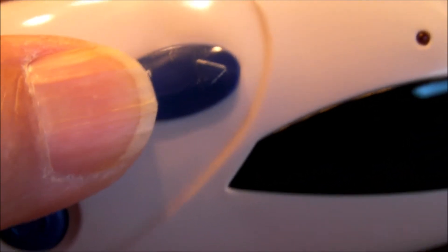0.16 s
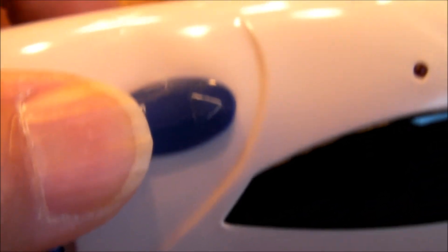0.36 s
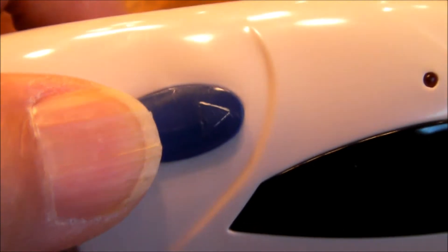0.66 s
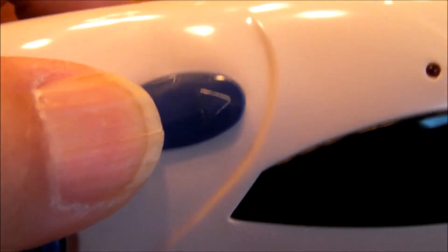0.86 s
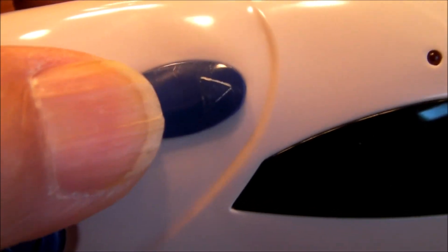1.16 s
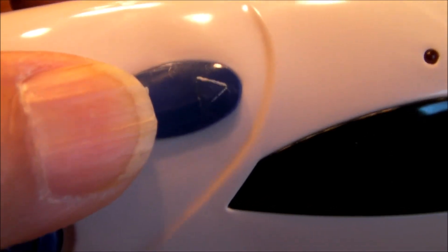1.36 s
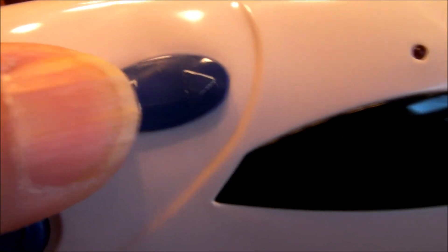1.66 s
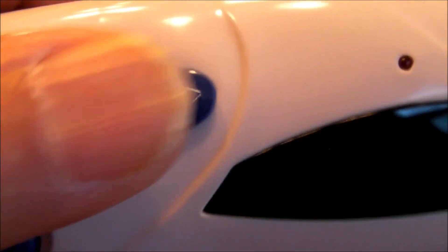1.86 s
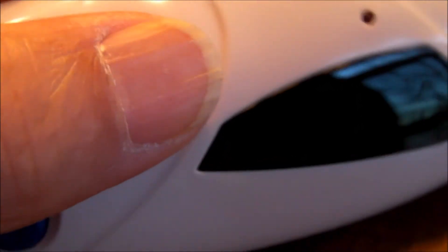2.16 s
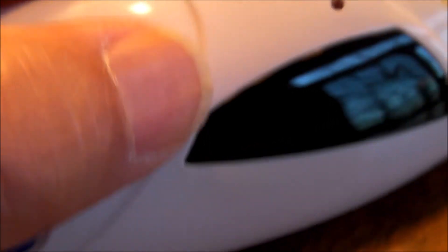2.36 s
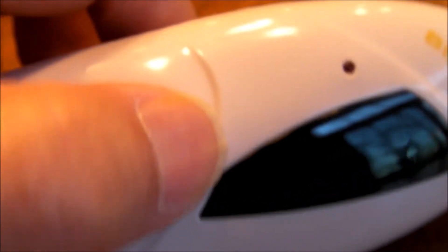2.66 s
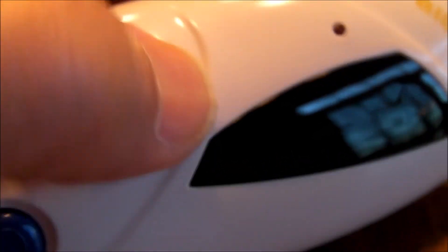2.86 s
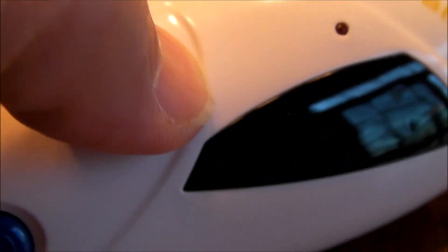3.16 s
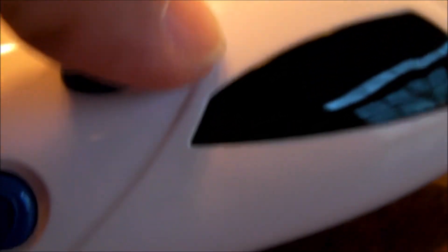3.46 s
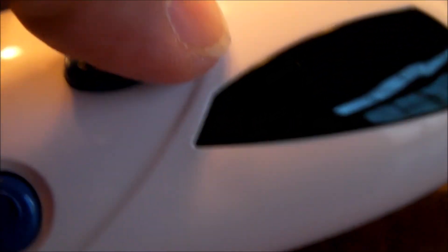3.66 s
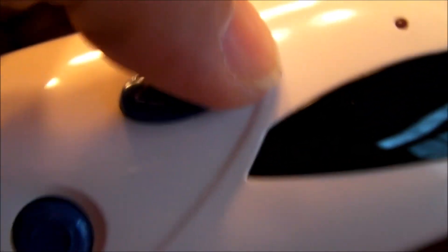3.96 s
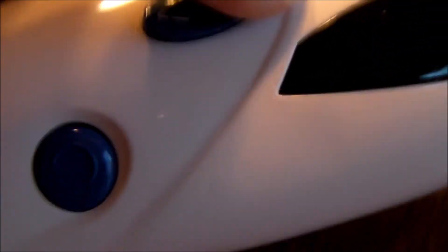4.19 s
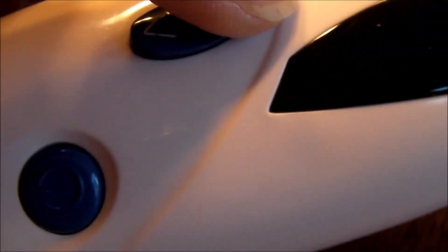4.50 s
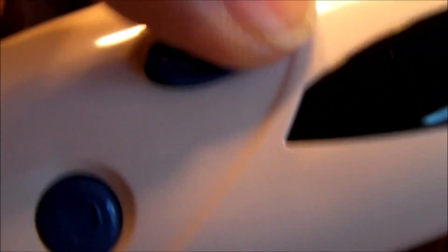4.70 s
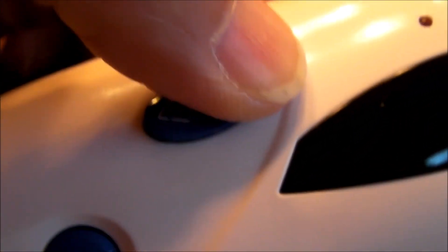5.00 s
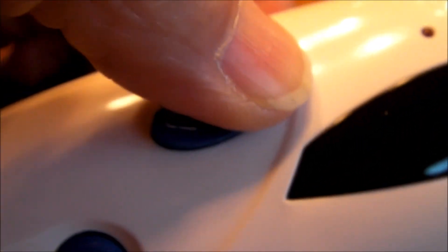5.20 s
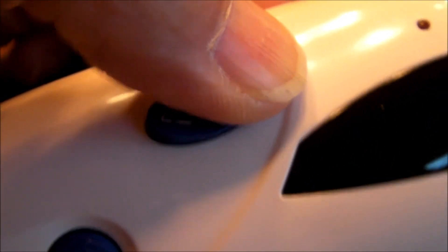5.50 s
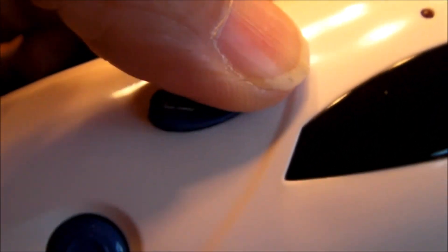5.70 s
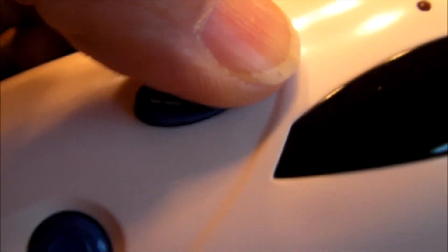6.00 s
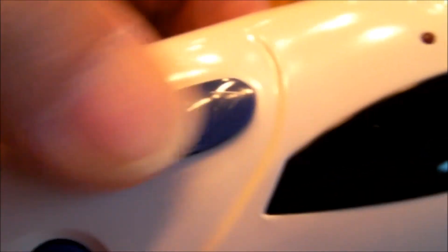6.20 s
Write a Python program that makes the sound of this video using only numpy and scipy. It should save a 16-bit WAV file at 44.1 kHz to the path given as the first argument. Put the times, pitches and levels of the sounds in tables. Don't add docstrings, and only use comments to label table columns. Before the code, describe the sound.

Firm, bright button clicks on a hollow handheld shell, first one alone, then a steady group. The shell bumps something with a low thump that rings briefly. After soft finger drags and a couple of muffled clicks there is a pause, then rapid paired clicks, strong and weak by turns, thicker in tone. Close stereo microphone, small indoor room with little echo, quiet hiss and low room noise.

```python
import sys
import numpy as np
from scipy import signal
from scipy.fft import rfft, irfft, next_fast_len
from scipy.io import wavfile
from scipy.ndimage import uniform_filter1d

SR = 44100
rng = np.random.default_rng(int(sys.argv[2]) if len(sys.argv) > 2 else 0)


def linear_from_db(decibels):
    return 10 ** (np.asarray(decibels, float) / 20)


def dump(signal):
    limited = np.clip(np.atleast_2d(signal).T, -1, 1)
    pcm = np.round(limited * 32767).astype(np.int16)
    wavfile.write(sys.argv[1], SR, pcm)


N = 279770

# start in seconds, peak of the 0.7-2 kHz shell ring in dB,
# edge (2-6 kHz) in dB re ring, fizz (above 6 kHz) in dB re ring.
NEAR_SNAPS = [
    (0.007, -24, -1.5, -4),
    (0.755, -24.5, -4.5, -3),
    (0.99, -23.5, -1, -4.5),
    (1.216, -25.5, -3.5, -3.5),
    (1.37, -24.5, -2, -4),
    (1.518, -25, -5, -2.5),
    (1.696, -23.5, 3, 3.5),
    (1.979, -49.5, 5.5, -35),
]
MUTED_SNAPS = [
    (3.113, -30, 4.2, 1.5),
    (3.366, -40, 4.6, 2.6),
]
FAR_SNAPS = [
    (4.648, -25, -10, -19.5),
    (4.897, -34.5, 2.5, 2),
    (5.132, -26, -9, -14),
    (5.327, -38, -3.5, 0),
    (5.493, -25.5, -4.5, -12),
    (5.603, -36, -3, -2),
    (5.723, -25, -6, -5.5),
    (5.881, -44.5, 0.5, -1),
    (5.986, -24.5, -6, -5.5),
    (6.127, -31, 2.5, -0.5),
]
KNOCKS = [
    (2.324, -29.5, 3.5, -6.5),
    (2.334, -34.5, -1.5, -9),
    (2.347, -41.5, -10, -12),
]
# start in seconds, ring in dB,
# brightness of edge and fizz in dB re ring.
NEAR_TOUCHES = [
    (0.399, -55.5, -11),
    (1.748, -53.5, 5),
    (1.914, -91.5, 32.5),
    (3.182, -52.5, -14),
    (3.211, -55, -7),
    (3.246, -55.5, -13),
    (3.283, -57.5, -0.5),
    (3.465, -64, 8.5),
    (3.67, -61.5, 12.5),
]
FAR_TOUCHES = [
    (0.179, -57, -13),
    (0.424, -55, -14),
    (0.518, -63, -17.5),
    (4.027, -56, -0.5),
    (4.581, -56, -6.5),
    (5.907, -64, -15),
    (6.307, -53, -6),
]

# frequency in Hz, level in dB, t60 in seconds.
NEAR_SHELL = [(400, -4, .03), (760, -8, .05), (958, -4, .03), (1110, 2, .03), (1260, -5, .02),
              (1550, -12, .012), (2560, -1, .011), (5100, -2, .01), (8400, 0, .006), (14000, 0, .003),
              (583, -2, .135)]
MUTED_SHELL = [(389, -9, 0.058), (645, -5.5, 0.036), (950, 0.5, 0.014), (1096, 1, 0.031), (1200, -15, 0.035),
               (2640, 2, 0.014), (4960, 4, 0.017), (5320, -1, 0.016), (8500, 0, 0.0034), (14000, 10, .003)]
FAR_SHELL = [(373.3, 11.5, 0.12), (411.3, 12.5, 0.12), (583.5, 15.5, 0.084), (740, 14, 0.0038),
             (886, 6, 0.0095), (1092, -1, 0.031), (1820, -5, 0.011), (2284, 2.5, 0.021), (2876, 5.5, 0.012),
             (8920, -1.5, 0.0032), (12170, 0, 0.0043), (14400, 4, .003)]
KNOCK_SHELL = [(119.7, -7.5, 0.26), (183.3, -3, 0.38), (267, -0.5, 0.11), (333, -11, 0.12),
               (417.5, 8.5, 0.11), (474, -6, 0.33), (567, 13, 0.052), (863, 11.5, 0.16), (986, 13.5, 0.084),
               (1280, -9, 0.26), (2320, -8, 0.058), (3930, -10, 0.027), (5600, 7, 0.014),
               (10570, -15, 0.028)]
# low edge in Hz, high edge in Hz, level in dB re clear modes, t60 in seconds.
SNAP_CROWD = [(298, 636, -3.5, 0.0155), (744, 1520, -6, 0.017), (1650, 6200, 3.5, 0.02),
              (6250, 13400, 19.5, 0.0056)]
PAD_CROWD = [(241, 865, -2.5, 0.063), (643, 2020, -12.5, 0.017), (2120, 6630, 2, 0.017),
             (6600, 13000, -7, 0.0029)]
KNOCK_CROWD = [(109, 620, -6.5, 0.2), (910, 1960, -0.5, 0.071), (2220, 6300, 11, 0.025),
               (6500, 20500, 4, 0.02)]

# frequency in Hz, level in dB, t60 in seconds.
BOOM = [(122.7, -41.5, 0.56), (169, -47, .55), (185.6, -44.5, 0.69), (247, -55, 0.27)]
# frequency in Hz, t60 in seconds.
ROOM = [(150, 0.88), (600, 0.56), (1500, 0.29), (4000, 0.22), (12000, 0.21)]
# frequency in Hz, phase in radians.
PORTS = [(100, -.05), (1500, -.12), (3200, -.3), (5000, -1.), (8000, -1.6), (12000, -1.9), (16000, -2.1)]
# frequency in Hz, level in dB re the hit's energy.
SMEAR = [(150, -37), (500, -11), (1100, -15.5), (2500, -13), (6000, -10.5), (12000, -12), (16000, -11)]

# start in seconds, length in seconds,
# top level in dB, squeak in Hz, squeak in dB re level.
DRAGS = [
    (1.734, 0.27, -65, 3300, -4),
    (2.108, 0.37, -60, 3700, -4),
    (2.707, 0.39, -64.5, 3830, -3),
    (3.039, 0.12, -56.5, 3860, -5),
    (3.145, .12, -61.5, 4240, 0),
    (3.254, 0.21, -62, 5170, -0.5),
    (3.67, 0.38, -60.5, 3200, -5),
    (3.84, 0.04, -60, 2850, 16),
    (3.892, 0.61, -58.5, 2550, -0.5),
    (6.155, 0.03, -48, 4160, 10),
]
SLIPS = [
    (1.961, 0.22, -53.5, 5600, -2.5),
    (2.34, .3, -58, 3320, -6.5),
    (3.41, 0.44, -62.5, 4300, -3),
    (6.17, 0.31, -60, 4160, 7),
]
# frequency in Hz, level in dB per Hz.
RUB = [(150, -11.5), (500, 0), (1200, 1.5), (2600, -2.5), (4500, -2.5), (8000, -4.5), (12000, -5),
       (16000, -6)]
HUSH = [(25, -19), (85, -12), (130, -7), (250, -16), (700, -20), (1200, -24), (4000, -30), (16500, -33.5)]
# frequency in Hz, likeness from -1 to 1.
RUB_SAME = [(60, 0.33), (180, 1), (550, 1), (1650, 0.84), (4970, 0.38), (15000, -0.25)]
HUSH_SAME = [(60, 0.49), (180, 0.94), (550, 0.37), (1650, -0.096), (4970, 0.0094), (15000, -0.17)]
# frequency in Hz, width in octaves, height in dB.
HUMS = [(187.4, 0.091, 6), (426, 0.26, 7), (3060, 0.15, 6)]

FIRM_DB = -24
NEAR_HOLLOW_DB, MUTED_HOLLOW_DB, FAR_HOLLOW_DB, KNOCK_HOLLOW_DB, TOUCH_HOLLOW_DB = -12.5, -12.5, -10, 3.3, -15.5
NEAR_SOFT, MUTED_SOFT, FAR_SOFT, KNOCK_SOFT = 0.46, 0.6, 0.64, 0.61
HOLLOW_PER_BRIGHT_DB = -1.2
NEAR_SMEAR_DB, MUTED_SMEAR_DB, FAR_SMEAR_DB, KNOCK_SMEAR_DB, TOUCH_SMEAR_DB = 4.5, 4.5, 5.5, -0.5, 4.5
BLOCK_S, BLOCK_START_S = 1024 / 48000, 0.0011
BLOCK_ROUND, BLOCK_PICK = 2, 1.47
DRAG_TOP, SLIP_TOP, ROUND = 0.47, 0.11, 0.96
BOOM_RISE_S = 0.03
HUSH_DB = -60


def evened(x):
    return x / np.sqrt(np.mean(x ** 2) + 1e-20)


def read(points, hz):
    f, value = np.transpose(points)
    return np.interp(np.log(hz + 1), np.log(f + 1), value)


def add(mix, s, sound):
    part = mix[:, round(s * SR):][:, :sound.shape[1]]
    part += sound[:, :part.shape[1]]


def level_out(x, shape):
    for _ in range(3):
        z = rfft(x * shape)
        x = irfft(z / (abs(z) + 1e-9), len(shape))
    return x * shape


def presses(snaps, touches, hollow_db, soft, smear_db):
    rows = [(s, db, hollow_db + soft * (FIRM_DB - db), edge, fizz, smear_db) for s, db, edge, fizz in snaps]
    for s, db, bright in touches:
        hollow = TOUCH_HOLLOW_DB + HOLLOW_PER_BRIGHT_DB * bright
        rows.append((s, db, hollow, bright, bright, TOUCH_SMEAR_DB))
    return sorted(rows)


def snap(row, shell, crowd, rattle_s, size):
    s, ring_db, hollow_db, edge_db, fizz_db = row[:5]
    t = np.arange(size) / SR
    u = t[:500] / rattle_s
    taps = rng.standard_normal((2, 500)) * (rng.random(500) < 0.2)
    shared, differing = level_out(taps, np.minimum(u * 8, 1) * np.exp(-u ** 2))

    hz, db, t60 = np.transpose(shell)[:, :, None]
    shifted = hz * (1 + 0.0078 * rng.standard_normal(hz.shape))
    modes = linear_from_db(db - 60 * t / t60) * np.sin(2 * np.pi * shifted * t)
    group = np.digitize(hz[:, 0], [700, 1950, 6000])
    levels = [ring_db + hollow_db, ring_db, ring_db + edge_db, ring_db + fizz_db]
    port_gaps = [0.07, 0.12, 0.2, 0.3]
    hiss, out = rng.standard_normal(size), np.zeros((2, size))
    for k, level_db in enumerate(levels):
        low_hz, high_hz, crowd_db, crowd_t60 = crowd[k]
        band = signal.butter(2, [low_hz, high_hz], "bandpass", fs=SR, output="sos")
        clear = modes[group == k].sum(0)
        dense = signal.sosfilt(band, level_out(hiss, linear_from_db(-30 * t / crowd_t60)))
        body = signal.sosfilt(band, evened(clear) + linear_from_db(crowd_db) * evened(dense))
        drive = shared + port_gaps[k] * np.outer([1, -1], differing)
        part = signal.fftconvolve(drive, body[None], axes=1)[:, :size]
        peak = np.sqrt(uniform_filter1d(part.mean(0) ** 2, size=128).max())
        out += linear_from_db(level_db) * part / peak
    return s, out


def smear(s, hit):
    t = np.arange(-1900, 1900) / SR
    into = (s + 0.002 - BLOCK_START_S) % BLOCK_S + np.array([[0], [BLOCK_S]])

    def block(u):
        return abs(np.sin(np.pi * np.clip(u / (2 * BLOCK_S), 0, 1)))

    both = block(into) ** BLOCK_PICK * block(into + t) ** BLOCK_ROUND
    shape = np.sqrt((both ** 2).sum(0))
    grain = rng.standard_normal((2, len(t)))
    side = signal.lfilter([0.5, -0.5], 1, grain[1])
    grain = (grain[0] + 1.76 * np.outer([1, -1], side)) * shape
    broad = np.sqrt(uniform_filter1d(abs(rfft(hit[:, :1500], len(t))) ** 2, size=16))
    colour = broad * linear_from_db(read(SMEAR, np.fft.rfftfreq(len(t), 1 / SR)))
    spread = irfft(rfft(grain / np.linalg.norm(grain[0])) * colour)
    skip = max(round((-t[0] - s) * SR), 0)
    return s + t[0] + skip / SR, spread[:, skip:]


def ports(x):
    size = next_fast_len(N)
    turn = np.exp(0.5j * np.outer([1, -1], read(PORTS, np.fft.rfftfreq(size, 1 / SR))))
    return irfft(rfft(x, size) * turn, size)[:, :N]


def room(x):
    taps = np.zeros((2, SR // 2))
    at = np.arange(200, SR // 2 - 20, 20)
    at = at + rng.integers(0, 20, (2, len(at)))
    np.put_along_axis(taps, at, rng.choice([-1., 1.], at.shape), 1)
    taps = taps + 2.2 * taps.mean(0)
    hz, t, z = signal.stft(taps, SR, nperseg=256)
    decay = linear_from_db(-60 * t / read(ROOM, hz)[:, None])
    tail = signal.istft(z * decay, SR, nperseg=256)[1]
    return signal.fftconvolve(x.mean(0)[None], tail / np.linalg.norm(tail[0]), axes=1)[:, :N]


def boom():
    t = np.maximum(np.arange(N) / SR - KNOCKS[0][0], 0)
    ringing = sum(linear_from_db(db - 60 * t / t60) * np.sin(2 * np.pi * hz * t) for hz, db, t60 in BOOM)
    return (1 - np.exp(-t / BOOM_RISE_S)) * ringing


def strokes(t):
    arches = []
    for rows, top in [(DRAGS, DRAG_TOP), (SLIPS, SLIP_TOP)]:
        for s, length, top_db in np.array(rows)[:, :3]:
            u = np.clip((t - s) / length, 0, 1) ** (np.log(0.5) / np.log(top))
            arches.append(linear_from_db(top_db) * abs(np.sin(np.pi * u)) ** ROUND)
    return np.array(arches)


def skin_db(t, hz):
    share = strokes(t[:, 0]).T ** 2
    share = share / (share.sum(1)[:, None] + 1e-12)
    squeak_hz, squeak_db = np.array(DRAGS + SLIPS).T[3:, :, None]
    bands = (squeak_db + 5.5) * np.exp(-(np.log2((hz + 1) / squeak_hz) / 0.36) ** 2)
    return read(RUB, hz) + share @ bands


def noise(size, colour_db, same, patchy_db):
    hz = np.fft.rfftfreq(size, 1 / SR)
    s = np.arange(4 * N // size + 5)[:, None] * size / 4 / SR
    a, b, c, d, patches = np.moveaxis(rng.standard_normal((len(s), len(hz), 5)), 2, 0)
    patches = evened(uniform_filter1d(uniform_filter1d(patches, size=8, axis=0), size=10, axis=1))
    same = np.clip(read(same, hz), -1, 1)
    left = a + 1j * b
    right = same * left + np.sqrt(1 - same ** 2) * (c + 1j * d)
    z = np.array([left, right]) * linear_from_db(colour_db(s, hz) + patchy_db * patches)
    return evened(signal.istft(z.transpose(0, 2, 1), nperseg=size, noverlap=3 * size // 4)[1][:, :N])


def rustle():
    level = linear_from_db(2.5) * np.sqrt((strokes(np.arange(N) / SR) ** 2).sum(0))
    return level * noise(size=512, colour_db=skin_db, same=RUB_SAME, patchy_db=2.5)


def hush_db(s, hz):
    return read(HUSH, hz) + sum(db * np.exp(-(np.log2((hz + 1) / f) / w) ** 2) for f, w, db in HUMS)


def hush():
    return linear_from_db(HUSH_DB) * noise(size=2048, colour_db=hush_db, same=HUSH_SAME, patchy_db=1.4)


def scene():
    near = presses(NEAR_SNAPS, NEAR_TOUCHES, NEAR_HOLLOW_DB, NEAR_SOFT, NEAR_SMEAR_DB)
    muted = presses(MUTED_SNAPS, [], MUTED_HOLLOW_DB, MUTED_SOFT, MUTED_SMEAR_DB)
    far = presses(FAR_SNAPS, FAR_TOUCHES, FAR_HOLLOW_DB, FAR_SOFT, FAR_SMEAR_DB)
    knock = presses(KNOCKS, [], KNOCK_HOLLOW_DB, KNOCK_SOFT, KNOCK_SMEAR_DB)
    hits, smears = np.zeros((2, 2, N))
    for rows, shell, crowd, rattle_s, size in [(near, NEAR_SHELL, SNAP_CROWD, 0.003, SR // 7),
                                               (muted, MUTED_SHELL, SNAP_CROWD, 0.0025, SR // 7),
                                               (far, FAR_SHELL, PAD_CROWD, 0.0026, SR // 7),
                                               (knock, KNOCK_SHELL, KNOCK_CROWD, 0.003, SR // 3)]:
        for row in rows:
            s, hit = snap(row, shell, crowd, rattle_s, size)
            add(hits, s, hit)
            add(smears, *smear(s, linear_from_db(row[-1]) * hit))
    direct = linear_from_db([[-0.5], [0.5]]) * ports(hits + smears)
    return direct + linear_from_db(-17.5) * room(hits) + boom() + rustle() + hush()


def top_cut(x):
    return signal.sosfilt(signal.butter(12, 16810, fs=SR, output="sos"), x)


def record(dry):
    bass_cut = signal.butter(2, 60, "highpass", fs=SR, output="sos")
    band_limit = signal.firwin(255, 15800, window=("kaiser", 7), fs=SR)
    heard = signal.oaconvolve(signal.sosfilt(bass_cut, dry), band_limit[None], "same")
    mix = signal.lfilter(*signal.iirnotch(7900, 40, SR), heard)
    return top_cut(mix)


dry = scene()
out = record(dry)
dump(out)
```